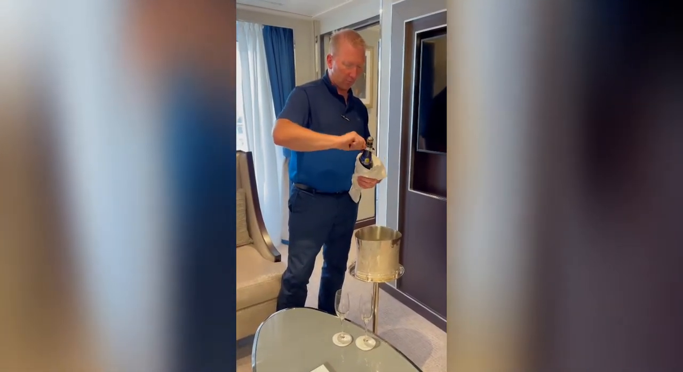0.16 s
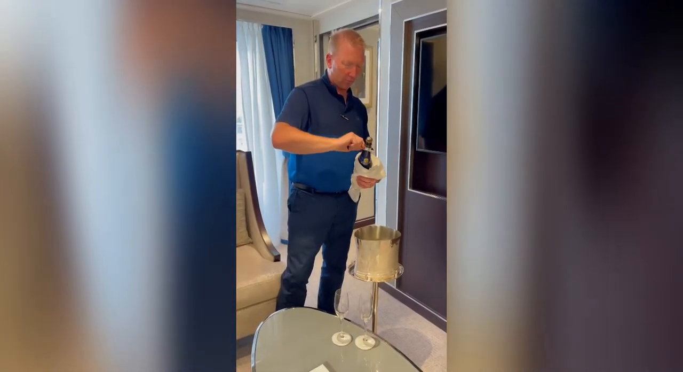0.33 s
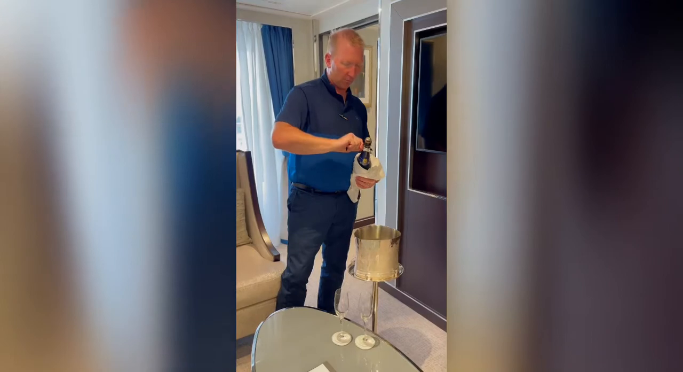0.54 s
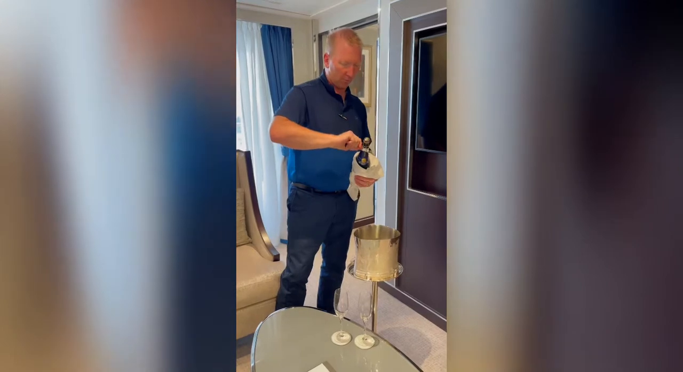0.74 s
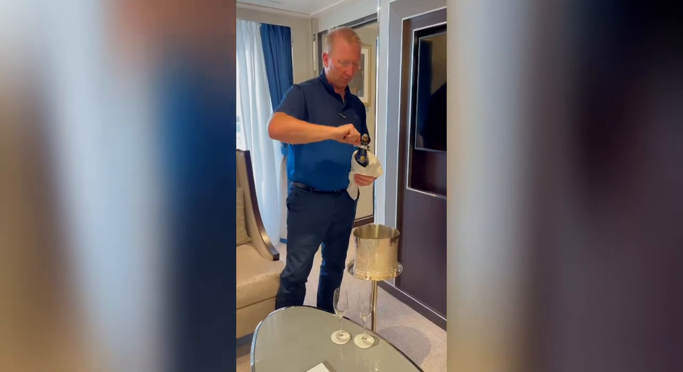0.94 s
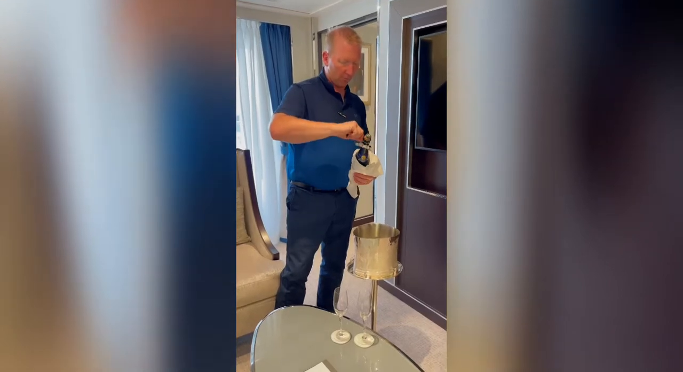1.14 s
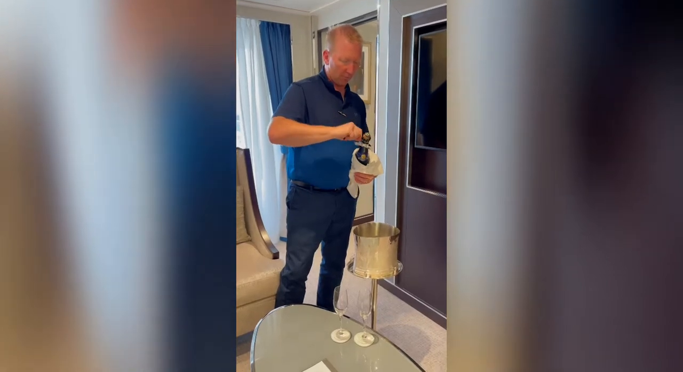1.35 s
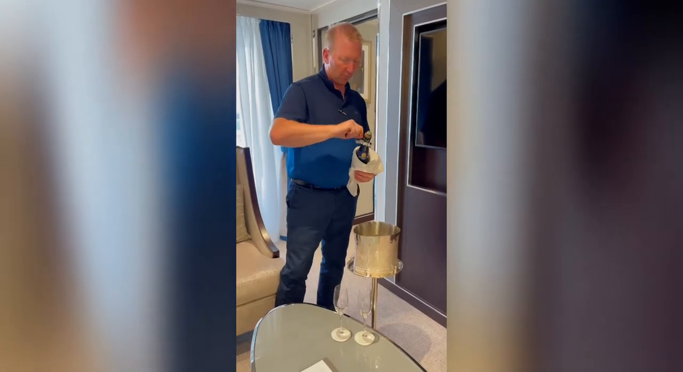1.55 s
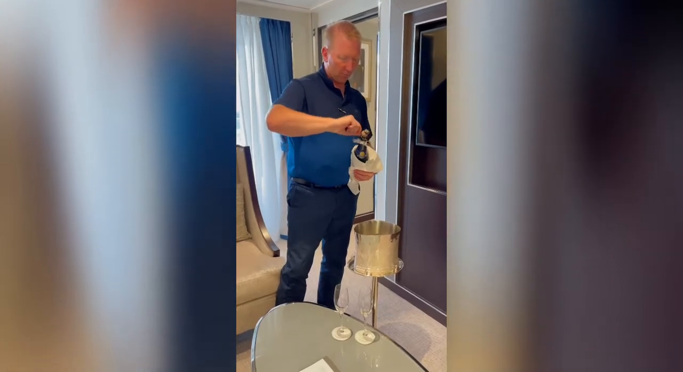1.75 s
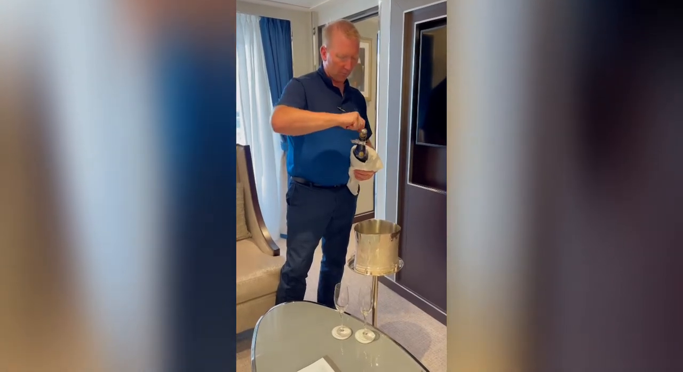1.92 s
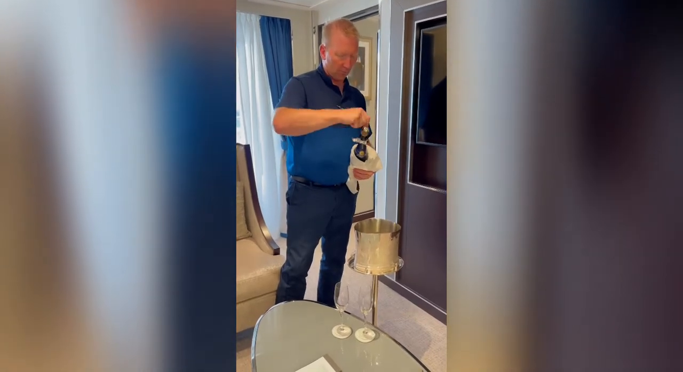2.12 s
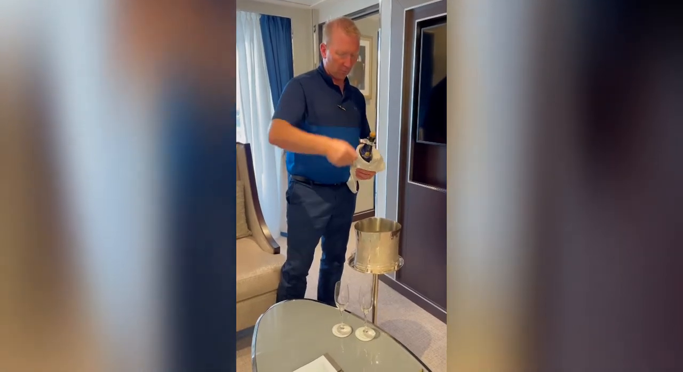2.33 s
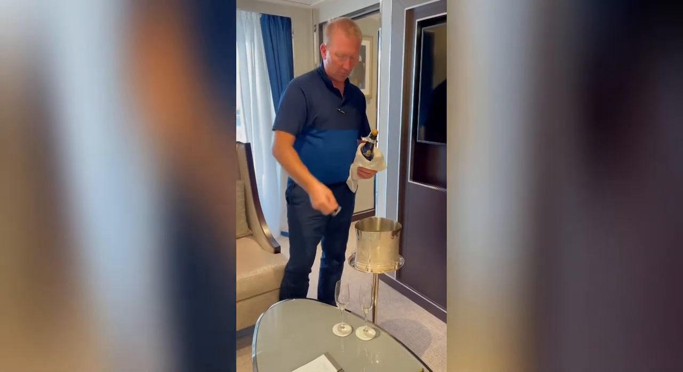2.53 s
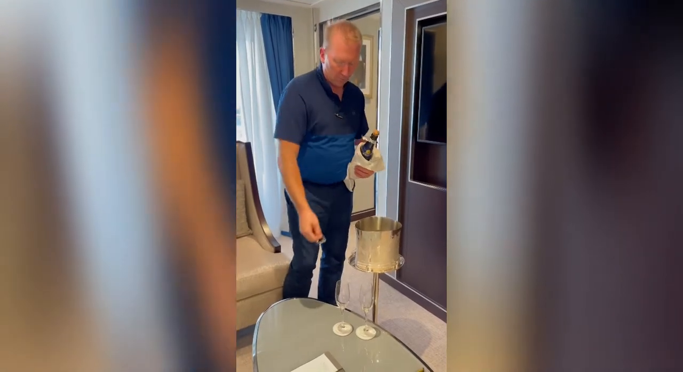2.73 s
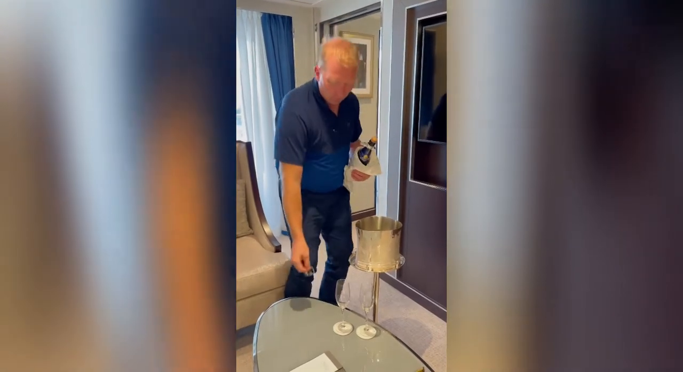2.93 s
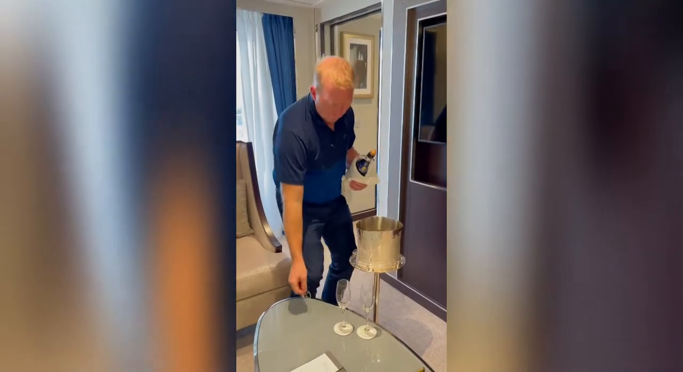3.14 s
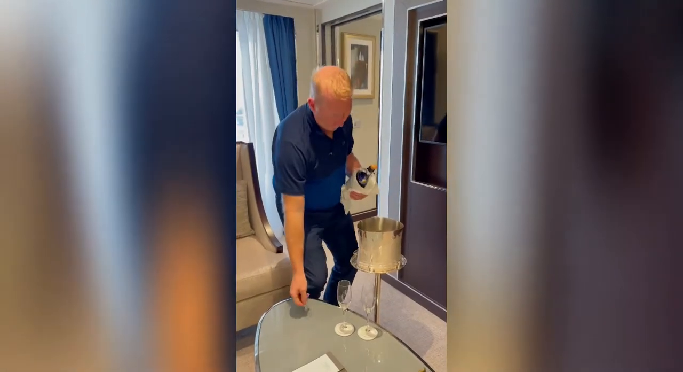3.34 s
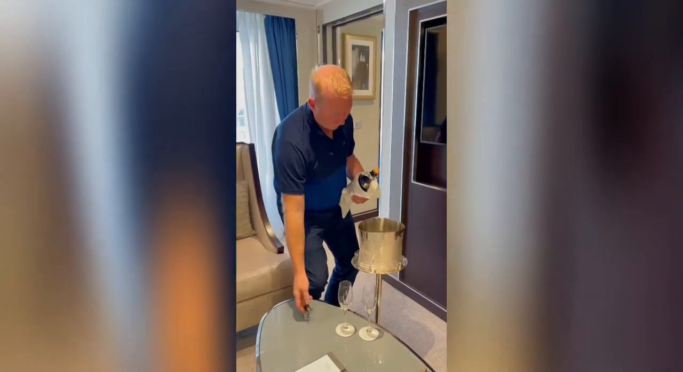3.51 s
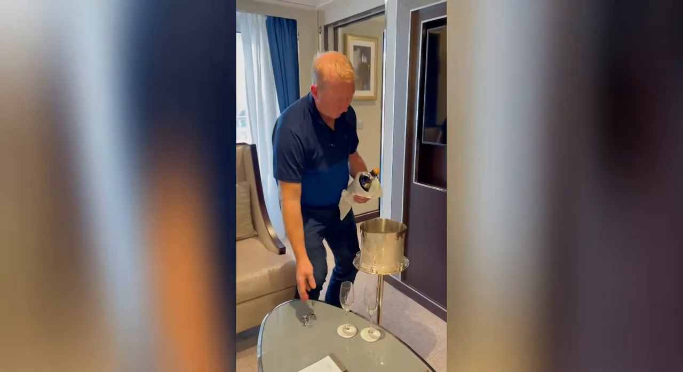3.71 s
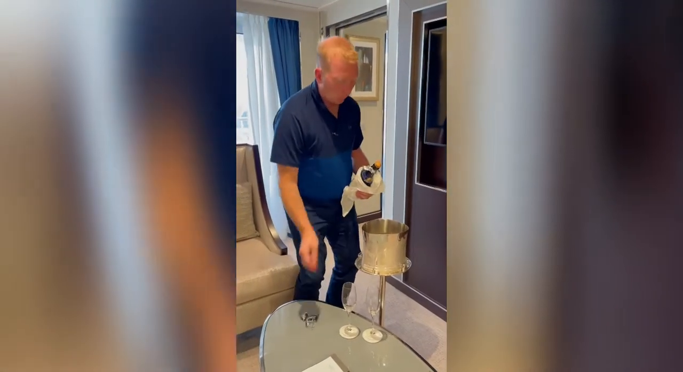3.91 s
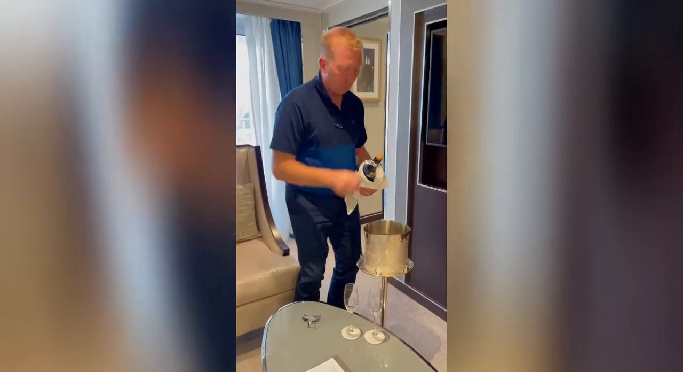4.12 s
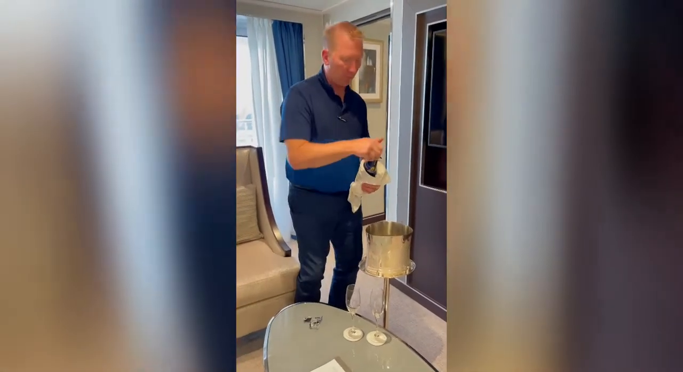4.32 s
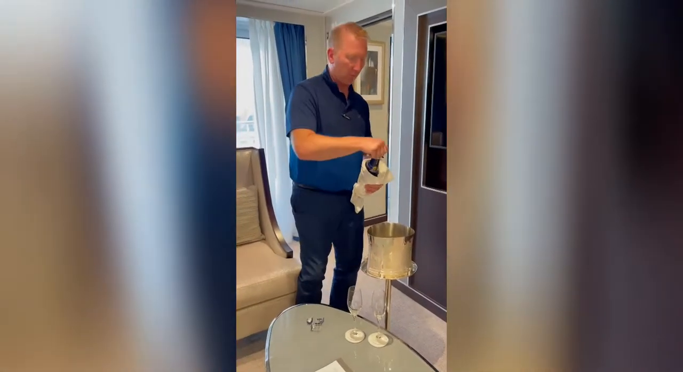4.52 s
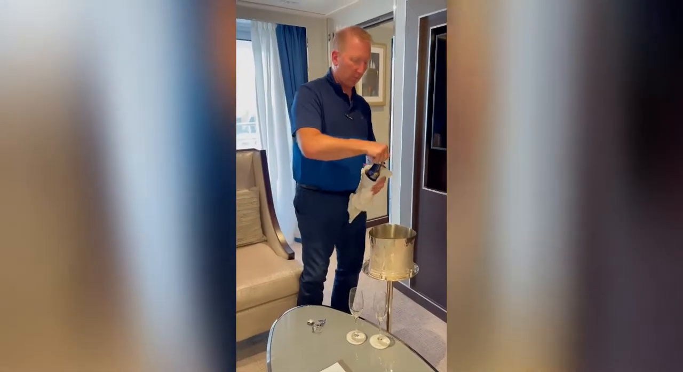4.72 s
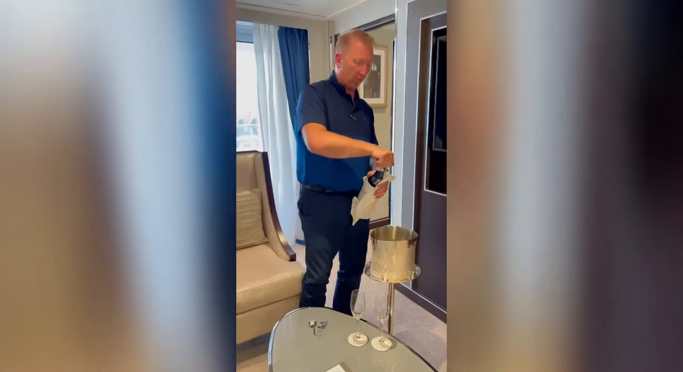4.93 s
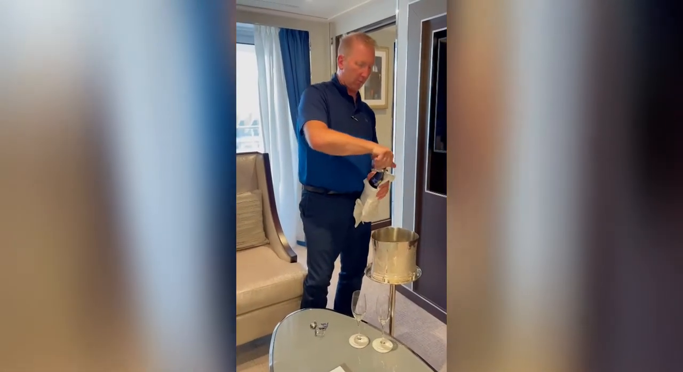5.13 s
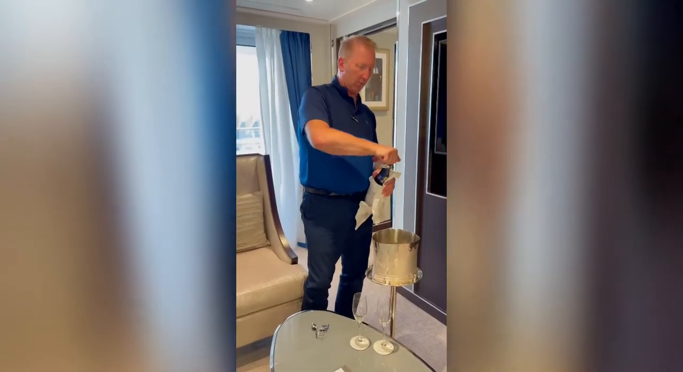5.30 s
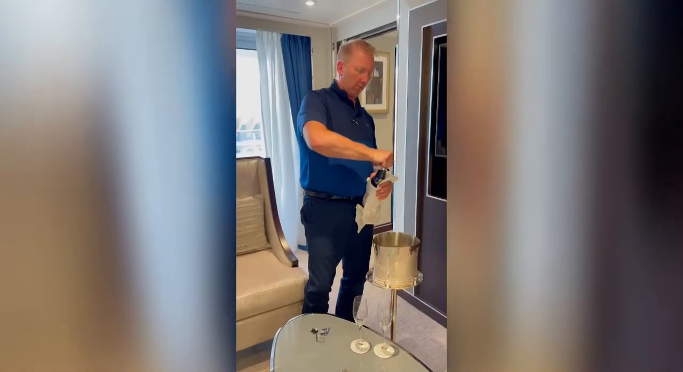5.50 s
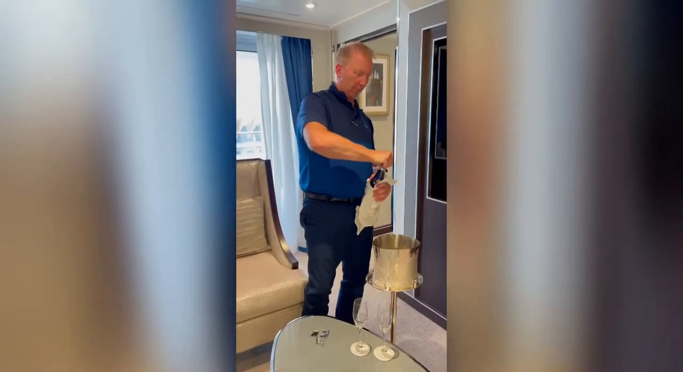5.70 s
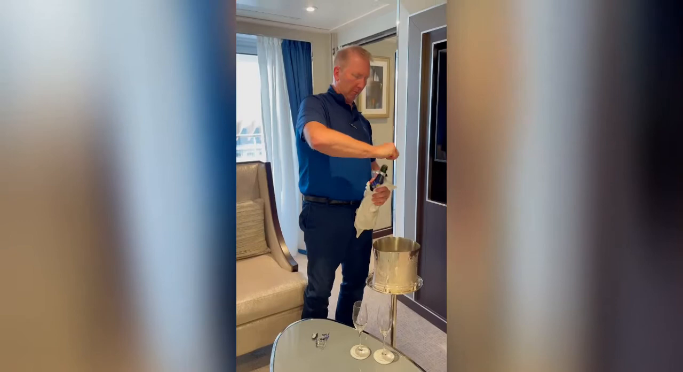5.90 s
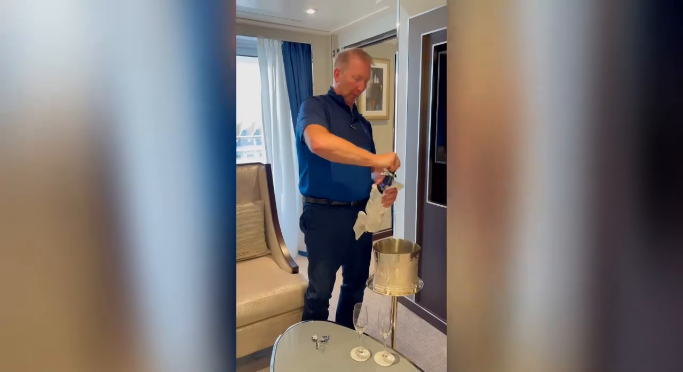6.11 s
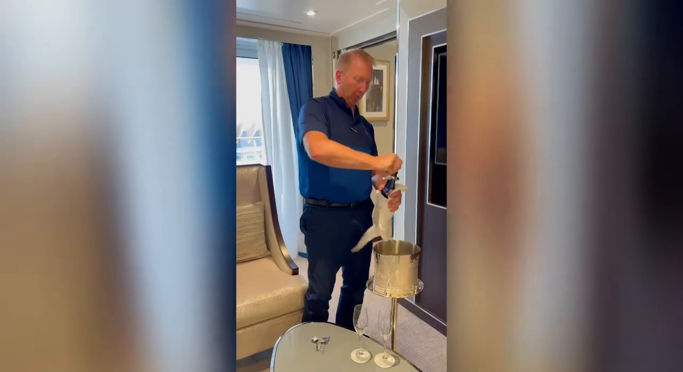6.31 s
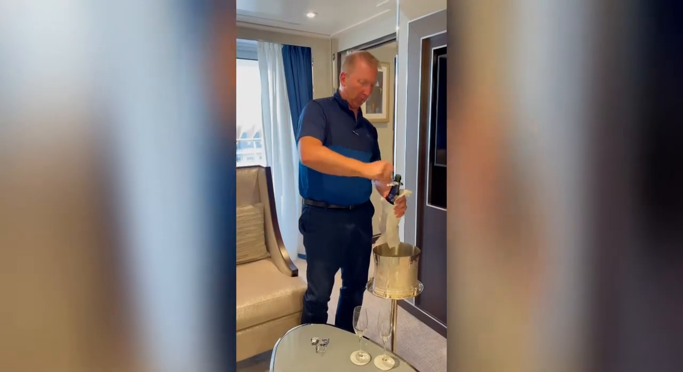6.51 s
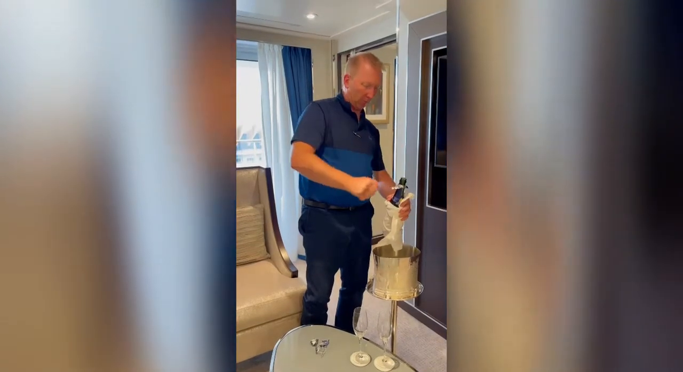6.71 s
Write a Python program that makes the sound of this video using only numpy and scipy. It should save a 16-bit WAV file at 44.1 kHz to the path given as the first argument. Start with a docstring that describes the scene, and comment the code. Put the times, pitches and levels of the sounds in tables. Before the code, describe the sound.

A small, soft-furnished room with faint low rumble and very light hiss, heard in stereo by a phone. From 0 to 2.4 s a wire cage on a bottle is untwisted: irregular, tiny bright ticks with thin metallic ringing and gritty scrapes, a clear click near 0.77 s and the strongest snap at 1.88 s. Cloth rustles from about 2.4 s as the arm moves. At 3.44 s the cage hits a glass table with a sharp clink, then rattles and rolls in small taps, fading by 4.2 s. From 4.5 to 5.8 s come soft napkin rustles and sparse, faint cork creaks, a stronger one just before 5.85 s. Then the cork pops, sudden and very loud: a crisp gas crack, hollow bottle-neck thump, sputtering hiss for about a third of a second and a short boomy room tail. Only rumble and barely audible ticks remain until about 6.6 s.

```python
"""The cork of a sparkling-wine bottle pops: a gas crack, a swing of the neck air, a sputtering stream, room waves.
Before it the wire cage is untwisted and dropped on a glass table, and the cork creaks in the neck:
dying noise bursts that ring wire and body modes. Sleeves and a napkin rustle as patchy noise, wire scrapes in grains.
The small soft-furnished room adds a diffuse tail over low rumble and hiss; a phone with two ports listens."""
import sys
import numpy as np
from scipy import signal
from scipy.fft import rfft, irfft
from scipy.io import wavfile
from scipy.ndimage import uniform_filter1d

SR = 44100
rng = np.random.default_rng(int(sys.argv[2]) if len(sys.argv) > 2 else 0)


def output_pcm(signal):
    """Save a mono or channel-first signal as 16-bit PCM at the path in sys.argv[1].

    Samples are clipped to [-1, 1] before scaling.
    """
    pcm = np.clip(np.atleast_2d(signal).T, -1, 1) * 32767
    wavfile.write(sys.argv[1], SR, np.round(pcm).astype(np.int16))


N = 297675
TIME = np.arange(N) / SR
HZ = np.maximum(np.fft.rfftfreq(N, 1 / SR), 1)
POP_S = 5.8503
POP_TIME = TIME[:SR]   # time since the pop [s]
POP_CLICK = signal.unit_impulse(SR)

# wire scrapes between the ticks: (loudest time [s], level [dB], wire ring [Hz])
SCRAPES = [(0.01, -68, 7800), (.53, -68.5, 3180), (0.838, -67, 2960), (1.08, -68, 3200),
           (1.37, -72.5, 6650), (1.42, -77, 3450), (1.8, -76, 6900), (1.93, -54, 6200), (2.28, -72, 6100)]
# arm, napkin and rolling cage once the wire is off: (time [s], cloth level [dB], grit level [dB])
MOVING = [(2.33, -88, -67), (2.41, -65.5, -103), (2.52, -62.5, -85), (2.72, -68.5, -77.5), (2.82, -65, -69),
          (3.0, -66.5, -72.5), (3.24, -72, -75), (3.49, -76, -81), (3.61, -58.5, -66), (3.71, -61, -50),
          (3.86, -63, -64.5), (3.96, -72, -72.5), (4.28, -68, -83), (4.52, -69.5, -66.5),
          (4.69, -62.5, -62), (4.81, -68, -87), (4.95, -73.5, -70), (5.28, -80, -103.5),
          (5.56, -78.5, -87.5), (5.802, -71, -90)]


def from_db(db):
    """Decibels to gain."""
    return 10 ** (np.asarray(db) / 20)


def rms_one(x):
    """Scale to unit rms."""
    return x / np.sqrt(np.mean(x ** 2) + 1e-20)


def at_hz(points, hz):
    """Read a (Hz, value) table on a log axis."""
    points_hz, values = np.transpose(points)
    return np.interp(np.log(hz), np.log(points_hz), values)


def coloured(x, spectrum):
    """White input given a spectrum; rms 1."""
    return rms_one(irfft(rfft(x) * from_db(at_hz(spectrum, HZ)), N))


def coloured_pair(spectrum):
    """Two unrelated coloured noises, as a wide source needs."""
    return np.array([coloured(n, spectrum) for n in rng.standard_normal((2, N))])


def drift(rate_hz):
    """Slow chance around zero: unit-spread random knots joined by straight lines."""
    knots = rng.standard_normal(int(N / SR * rate_hz) + 2)
    return np.interp(TIME * rate_hz, np.arange(len(knots)), knots)


def ring(x, hz, t60_s):
    """Damped resonator: a unit click sets a sine of height 1 ringing."""
    r = from_db(-60 / (max(t60_s, .002) * SR))
    w = 2 * np.pi * hz / SR
    return signal.lfilter([0, np.sin(w)], [1, -2 * r * np.cos(w), r * r], x)


def ring_modes(x, modes):
    """Sum of resonators, one for each (Hz, dB, t60 s)."""
    return sum(from_db(db) * ring(x, hz, t60_s) for hz, db, t60_s in modes)


def rumble():
    """Low noise that swells and sinks."""
    # (frequency [Hz], density [dB per Hz])
    rumble_spectrum = [(12, -39), (20, -8), (48, 3), (76, 5), (97, -1.5), (130, -12.5), (343, -23),
                       (422, -34.5), (700, -52.5), (910, -69), (1540, -120)]
    return from_db(-49 + 2 * drift(6)) * coloured_pair(rumble_spectrum)


def hiss():
    """Steady faint noise, weaker toward the treble."""
    # (frequency [Hz], density [dB per Hz])
    hiss_spectrum = [(400, -2.5), (1000, -5.5), (2000, -16), (5000, -17.5), (10000, -22)]
    return from_db(-77.5) * coloured_pair(hiss_spectrum)


def room_tail(x):
    """Two unrelated diffuse tails: octave bands of noise, each dying at its own rate, stronger at first."""
    # (frequency [Hz], t60 [s])
    reverb_t60 = [(100, 0.9), (300, 0.41), (1000, 0.33), (3000, 0.4), (8000, 0.3)]
    late_db, early_db, early_t60_s = -33.5, -29.5, 0.071
    low_tail_db = 1.5   # lift of the bands that start below 900 Hz
    t, tail = TIME[:SR * 3 // 4], 0
    for low in 60 * 2. ** np.arange(0, 8):
        sos = signal.butter(2, [low, 2 * low], "band", fs=SR, output="sos")
        t60_s = at_hz(reverb_t60, low * np.sqrt(2))
        fall = from_db(late_db - 60 * t / t60_s) + from_db(early_db - 60 * t / early_t60_s)
        fall *= (t > .0015) * from_db(low_tail_db * (low < 900))
        tail = tail + signal.sosfilt(sos, rng.standard_normal((2, len(t)))) * fall
    return signal.fftconvolve(x[None], tail, axes=1)[:, :N]


def share_between_ports(diffuse):
    """Weight two unrelated signals into the sum and difference of ports that hear diffuse sound partly alike."""
    # (frequency [Hz], likeness of diffuse sound at the two ports [0-1])
    likeness = [(60, 1), (280, 0.93), (600, 0), (1200, 0.2), (1720, 0.8), (2250, 1), (3000, 0.2),
                (3800, 0.3), (4600, 0.5), (5860, 1), (7000, 0.4), (8950, 1), (10000, 0.9)]
    alike = np.clip(at_hz(likeness, HZ), 0, 1)
    return irfft(rfft(diffuse) * np.sqrt([(1 + alike) / 2, (1 - alike) / 2]), N)


def scrape_strokes():
    """Gain of each wire scrape, rising to its loudest moment and falling from it."""
    rise_db_per_s, fall_db_per_s = 149, 239
    return [from_db(db - rise_db_per_s * np.maximum(at - TIME, 0) - fall_db_per_s * np.maximum(TIME - at, 0))
            for at, db, _ in SCRAPES]


def moving_gain(column):
    """Gain of one MOVING column; the hands rest after the pop."""
    s = np.transpose(MOVING)[0]
    moving = (TIME > s[0]) & (TIME < POP_S)
    return moving * from_db(np.interp(TIME, s, np.transpose(MOVING)[column]))


def cloth_rustle(strokes):
    """Cloth is smooth patchy noise; the sleeve rustles along with each scrape."""
    # (frequency [Hz], density [dB per Hz])
    cloth_spectrum = [(250, -6), (500, -0.5), (1000, -0.5), (2000, -6), (3200, -7.5), (4500, -13),
                      (6400, -19.5), (10000, -14.5)]
    sleeve_db = -13   # re the scrape
    patches = from_db(1.7 * drift(25) + 1.0 * drift(7.1))
    return coloured_pair(cloth_spectrum) * (moving_gain(1) + from_db(sleeve_db) * sum(strokes)) * patches


def wire_scratch(strokes):
    """Wire scrapes in dense uneven grains, which also set the wire ringing."""
    # (frequency [Hz], density [dB per Hz])
    scratch_spectrum = [(1200, -25), (2500, -8.5), (3200, -14), (4500, -5.5), (6200, -8.5), (8000, -5.5),
                        (10000, -6.5)]
    grains_per_s, ring_db, ring_cycles = 900, -5.5, 18
    sizes = from_db(3.0 * np.minimum(rng.exponential(1, N), 5)) * rng.choice([-1, 1], N)
    clicks = sizes * (rng.random(N) < grains_per_s / SR)
    grit = coloured(clicks, scratch_spectrum) * (moving_gain(2) + sum(strokes))
    ringing = sum(stroke * rms_one(ring(clicks, hz, ring_cycles / hz))
                  for stroke, (_, _, hz) in zip(strokes, SCRAPES))
    return (grit + from_db(ring_db) * ringing) * from_db(2.4 * drift(52))


def contact_burst(noise, tick_db, t60_s, rise_s, lead):
    """A first-touch tick, then dying crackle, with the chance peaks of its spectrum evened out."""
    t = TIME[:len(noise)]
    # squared noise crackles: a few strong contacts among many weak ones
    burst = noise * np.abs(noise) * from_db(-60 * t / t60_s) * (1 - np.exp(-t / rise_s))
    burst[0] = from_db(tick_db)
    wave = rfft(np.roll(burst, lead))
    power = np.abs(wave) ** 2
    return irfft(wave * np.sqrt(power.mean() / uniform_filter1d(power, size=40)), len(noise))


def struck(events, modes, burst_t60_s, middle_db, snap_db, low_hz, tick_db, rise_s):
    """Each contact is a noise burst heard as a broad snap in three ranges, the wire's ring and the body's modes."""
    length, lead = SR // 8, 88   # samples; lead is the room ahead of the first touch
    tick_follows = 0.34          # harder contacts start with a sharper tick [dB per dB above -42]
    middle_follows, focus_db = 0.41, 5.5   # share of the low weight; lift when the ring lies in the middle range
    ring_cycles, strand_split = 35, 0.037  # cycles to fall 60 dB; share by which three strands lie apart
    bend, spread_db = .04, 3     # chance in each body mode's frequency [share] and level
    ranges = [signal.butter(4, edges, "band", fs=SR, output="sos")
              for edges in ([low_hz, 2300], [2300, 4900], [4900, 12000])]
    no_bass = signal.butter(2, low_hz * .7, "high", fs=SR, output="sos")
    out = np.zeros(N)
    for s, db, weight_db, ring_hz, ring_db in events:
        burst = contact_burst(rng.standard_normal(length), tick_db + tick_follows * (db + 42),
                              burst_t60_s, rise_s, lead)
        lift_db = middle_db + middle_follows * weight_db + focus_db * (2300 < ring_hz < 4900)
        levels = from_db([weight_db, lift_db, 0])
        sound = from_db(snap_db) * sum(g * signal.sosfilt(sos, burst) for g, sos in zip(levels, ranges))
        push = burst / np.sqrt(np.sum(burst ** 2))   # unit energy, so a long contact rings no louder
        thin = signal.sosfilt(no_bass, push)         # thin wire moves little air below its ring
        body = [(hz * (1 + bend * rng.standard_normal()), mode_db + spread_db * rng.standard_normal(), t60_s)
                for hz, mode_db, t60_s in modes]
        strands = [(ring_hz * (1 + strand_split * j), ring_db - 7.5, ring_cycles / ring_hz) for j in (-1, 0, 1)]
        for hz, mode_db, t60_s in body + strands:
            level = levels[int(hz > 2300) + int(hz > 4900)]
            sound += level * from_db(mode_db) * ring(thin if hz > low_hz else push, hz, t60_s)
        at = round(s * SR) - lead
        out[at:at + length] += from_db(db) * sound
    return out


def cage_untwisted():
    """Wire ticks as it is untwisted, ringing as bent at each moment."""
    # (time [s], level [dB], low-range weight [dB], wire ring [Hz], wire ring level [dB])
    twist = [(0.1186, -59, -25, 4040, 11), (0.1855, -52.5, -31, 4170, 12), (0.3246, -55.5, -14, 6950, 0.5),
             (0.4303, -60, -27, 3200, 0), (0.4547, -54, -29, 4400, 12), (0.4864, -58, -16, 2950, 9),
             (0.4941, -48.5, -20, 5570, 1), (0.5118, -54.5, 1.5, 6760, 13.5),
             (0.5195, -43.5, -11, 5500, -3), (0.5277, -45.5, -35, 6340, 4), (0.5601, -46, -32, 2940, 13),
             (0.5735, -64.5, 2, 1580, 8.5), (0.6992, -68, 2, 2300, 6), (0.7495, -65, -6, 2970, 12),
             (0.7651, -33, -15.5, 7000, -3), (0.9626, -41.5, -28, 5920, 13), (0.9655, -63, -15, 2950, 0),
             (1.056, -43.5, -28, 5900, -11), (1.071, -46.5, -14, 4860, 6.5), (1.1391, -42.5, -12, 5950, 5),
             (1.3442, -47.5, -19.5, 2900, 3.5), (1.372, -58, -28, 6300, 13.5),
             (1.4027, -48.5, -5, 7600, -7), (1.4246, -67.5, -9, 3410, 19), (1.529, -42, -19, 6900, -1),
             (1.5925, -63, 0, 4000, 0.5), (1.6617, -53.5, 3, 5900, 15), (1.666, -55, 4.5, 1230, 2.5),
             (1.7612, -68, -34, 6300, -6), (1.7705, -68, -27, 6500, 5), (1.7795, -62, -36, 6800, 16),
             (1.7887, -59.5, -40, 6300, 13.5), (1.7955, -56, -36, 6950, 2), (1.823, -62, -24, 6340, 18),
             (1.84, -39.5, -10, 6200, 4), (1.8824, -25, -45, 6170, 5), (1.8865, -45.5, -7.5, 2830, 18.5),
             (1.928, -42, -30, 5700, 14.5), (1.9363, -36, -12, 6040, -22), (2.1816, -56.5, -5, 3600, -21),
             (2.2841, -47, -11, 5700, -5), (2.3975, -52, 3, 6300, 9.5)]
    # body modes: (frequency [Hz], level [dB], t60 [s])
    cage = [(1215, -2, 0.0041), (2150, -9, 0.014), (3120, -12.5, 0.058), (6000, -13.5, 0.014)]
    return struck(twist, cage, burst_t60_s=0.0112, middle_db=-3.5, snap_db=3.5, low_hz=1266,
                  tick_db=13.5, rise_s=0.00046)


def cage_dropped():
    """The cage bounces and rolls on the glass table, exciting both."""
    # (time [s], level [dB], low-range weight [dB], wire ring [Hz], wire ring level [dB])
    drop = [(3.441, -22.5, -11.5, 6300, 4.5), (3.4485, -44.5, -8, 1590, 14.5),
            (3.4711, -38.5, 5, 4200, -11), (3.494, -36, -4, 2120, -23), (3.5207, -40, -4, 3230, -6),
            (3.5275, -30, -18, 5760, 0.5), (3.5666, -39.5, -12, 5610, -3), (3.579, -37.5, -11, 1010, -4.5),
            (3.6427, -45, -10, 5650, 8), (3.6774, -32.5, -17.5, 3680, 9), (3.6855, -40, -19, 3280, 11.5),
            (3.702, -32.5, -10, 5080, 4), (3.7181, -41, -6, 4030, -8), (3.7584, -35.5, -18, 6300, -2),
            (3.7968, -45.5, -12, 6700, 3), (3.8575, -50.5, -4, 1030, -3), (3.9384, -54.5, -7, 4200, -8),
            (4.0549, -59, -8.5, 2030, 0), (4.1086, -58.5, -2, 2230, -7), (4.1696, -57.5, 0.5, 1020, -7)]
    # body modes: (frequency [Hz], level [dB], t60 [s])
    cage_on_glass = [(243, -14, 0.044), (341, -6.5, 0.018), (1460, -10, 0.011), (2090, -2.5, 0.0088),
                     (6560, -8.5, 0.0065)]
    return struck(drop, cage_on_glass, burst_t60_s=0.0156, middle_db=-4.0, snap_db=-2.0, low_hz=780,
                  tick_db=15.5, rise_s=0.0004)


def cork_creaks():
    """The worked cork slips in the neck, slower in onset; faint ticks follow as the grip settles."""
    # (time [s], level [dB], low-range weight [dB], ring [Hz], ring level [dB])
    creak = [(4.4957, -54.5, -1, 5530, 5.5), (4.6084, -54.5, 2, 1910, -15), (4.8554, -55, -2, 5340, 1),
             (4.9731, -49.5, -3, 1276, -13), (5.1776, -61, -0.5, 5570, 3), (5.2834, -61, -0.5, 5560, -2.5),
             (5.4555, -60, 0.5, 5440, -3), (5.5438, -58, 1, 2100, -14), (5.6984, -60.5, -6, 5500, 1),
             (5.7733, -64, -8, 5950, 1.5), (5.8385, -38.5, 12, 2917, 0), (6.2864, -71, 2, 5450, 8),
             (6.3274, -70.5, 4.5, 1320, -17), (6.4464, -70.5, 0, 1259, -11), (6.6054, -72.5, -3, 1280, -6)]
    # body modes: (frequency [Hz], level [dB], t60 [s])
    cork_in_neck = [(1171, -8, 0.014), (1950, -12.5, 0.017), (4600, 3, 0.022), (5444, -3, 0.0063),
                    (5723, -1.5, 0.01)]
    return struck(creak, cork_in_neck, burst_t60_s=0.0344, middle_db=-12.0, snap_db=1.5, low_hz=750,
                  tick_db=-2.0, rise_s=0.0021)


def at_pop(x):
    """Place a signal at the pop, cut at the end of the scene."""
    out = np.zeros(N)
    start = round(POP_S * SR)
    out[start:] = x[:N - start]
    return out


def standing_waves():
    """Low modes along the room and wall-to-wall modes across the ports, rung by the pop."""
    # (frequency [Hz], level [dB] ahead of along_db, t60 [s])
    room_modes = [(63, -8.5, 0.25), (84.3, -3, 0.33), (116, -1.5, .2), (146.7, -10, 0.18),
                  (174, -8.5, 0.32), (221.4, -2, 0.26), (246, -5, 0.28), (285.5, -7, 0.43),
                  (304, -9.5, 0.23), (327, -6.5, 0.23), (345.4, -10.5, 0.52), (391, -4.5, 0.23),
                  (420, -17, 0.29), (537, -15.5, 0.29), (572.5, -14.5, 0.63), (584, -12, 0.48),
                  (597, -6.5, 0.28), (751, -11.5, 0.17), (945, -15.5, .15), (1037, -20.5, 0.22)]
    # wall-to-wall waves across the ports: (frequency [Hz], level [dB], t60 [s])
    cross_modes = [(590, -23, 0.68), (620, -24.5, .4), (399, -30.5, .3)]
    along_db, build_s = -15.5, 0.0028
    build = 1 - np.exp(-(POP_TIME / build_s) ** 2)   # standing waves need a few wall passes
    along = sum((-1) ** k * from_db(along_db) * ring_modes(POP_CLICK, [mode])
                for k, mode in enumerate(room_modes))
    return at_pop(build * along), at_pop(-build * ring_modes(POP_CLICK, cross_modes))


def gas_stream():
    """Gas streams out past the hand, sputtering and weakening; its last hiss fades quickly around fade_s."""
    # (frequency [Hz], density [dB per Hz])
    gas_spectrum = [(300, 6.5), (800, 0), (2000, -16), (4000, -14), (6500, -13), (10000, -16)]
    start_db, t60_s, fade_s = -37.5, 1, 0.35
    gas = coloured(rng.standard_normal(N), gas_spectrum)[:SR] * from_db(start_db - 60 * POP_TIME / t60_s)
    gas *= from_db(2.1 * drift(45)[:SR])
    return at_pop(gas / (1 + np.exp((POP_TIME - fade_s) / 0.02)))


def neck_air():
    """The neck air swings: a main swing growing while the cork clears, overtones and the push of released gas."""
    # (frequency [Hz], level [dB], t60 [s])
    neck_modes = [(607, -8.5, 0.06), (868, -12, 0.034), (34, -20, .15)]
    lag_s, thump_hz, thump_db, thump_s = .0011, 322, -5, 0.0015
    overtones = ring_modes(np.roll(POP_CLICK, round(lag_s * SR)), neck_modes)
    since = np.maximum(POP_TIME - lag_s, 0)
    swell = (since / thump_s / 2) ** 2 * np.exp(2 - since / thump_s)   # peak 1
    return at_pop(overtones + from_db(thump_db) * swell * np.sin(2 * np.pi * thump_hz * since))


def gas_crack():
    """The crack of escaping gas, a short noise burst; and the same energy as one pulse for the walls."""
    # (frequency [Hz], density [dB per Hz])
    crack_spectrum = [(500, -1), (900, -3.5), (1500, -4), (2200, -4.5), (3200, -11.5), (5000, -5.5),
                      (7500, -6.5), (10000, 2)]
    crack_db, rise_s, decay_s = -2.5, 0.000056, 0.0031
    crack = coloured(rng.standard_normal(N), crack_spectrum)[:SR]
    crack *= (1 - np.exp(-POP_TIME / rise_s)) * np.exp(-POP_TIME / decay_s)
    # the walls hear the crack from all sides: its even spectrum
    pulse = coloured(signal.unit_impulse(N, round(.003 * SR)), crack_spectrum)[:SR]
    pulse *= np.sqrt(np.sum(crack ** 2) / np.sum(pulse ** 2))
    return at_pop(from_db(crack_db) * crack), at_pop(from_db(crack_db) * pulse)


def scene():
    """Row 0: what both ports share; row 1: what differs between them."""
    strokes = scrape_strokes()
    crack, crack_at_walls = gas_crack()
    along, across = standing_waves()
    near = wire_scratch(strokes) + cage_untwisted() + cage_dropped() + cork_creaks() + gas_stream()
    diffuse = room_tail(near + crack_at_walls) + cloth_rustle(strokes) + rumble() + hiss()
    return share_between_ports(diffuse) + [near + crack + neck_air() + along, across]


def suppress(x):
    """Noise suppressor: the range above the rumble is turned down as its own level sinks under a threshold."""
    above_hz, threshold_db, depth_db, window_s = 433, -72.5, 3.5, 0.0083
    high = irfft(rfft(x) / (1 + (above_hz / HZ) ** 4), N)
    power = uniform_filter1d(np.mean(high ** 2, axis=0), round(window_s * SR))
    level_db = 10 * np.log10(power + 1e-14)
    cut_db = np.clip(level_db - threshold_db, -depth_db, 0)
    return x + high * (from_db(cut_db) - 1)


def record(dry):
    """Sum and difference become left and right, the ports shift phase; quiet sound sinks, peaks round, top is cut."""
    # port resonance: (frequency [Hz], gain [dB])
    microphone = [(100, -1.5), (7000, 2), (8500, 3), (10000, 4)]
    # (frequency [Hz], phase by which the left port leads [rad])
    port_phase = [(0, 0), (1720, 0), (2750, .7), (3800, .8), (4300, 1.3), (4830, 3.14), (5340, 5.4),
                  (5860, 6.28), (6400, 6.6), (7900, 8.5), (9000, 9.42), (9500, 9.7), (10000, 10.4)]
    overload, cutoff_hz = .95, 11100
    shared, differing = rfft(dry) * from_db(at_hz(microphone, HZ))
    turn = np.exp(.5j * np.interp(HZ, *np.transpose(port_phase)))   # half the lead on each port
    left, right = (shared + differing) * turn, (shared - differing) / turn
    ports = suppress(irfft([left, right], N))
    ports = overload * np.tanh(ports / overload)
    return signal.sosfilt(signal.cheby2(14, 70, cutoff_hz, fs=SR, output="sos"), ports)


dry = scene()
out = record(dry)
output_pcm(out)
```